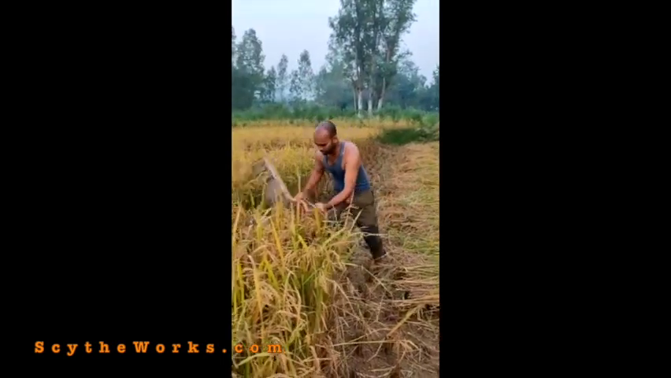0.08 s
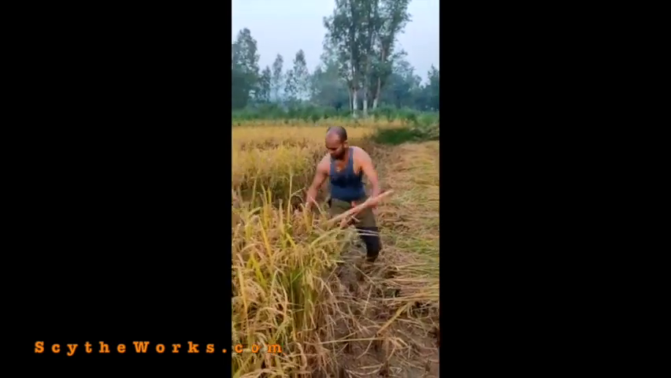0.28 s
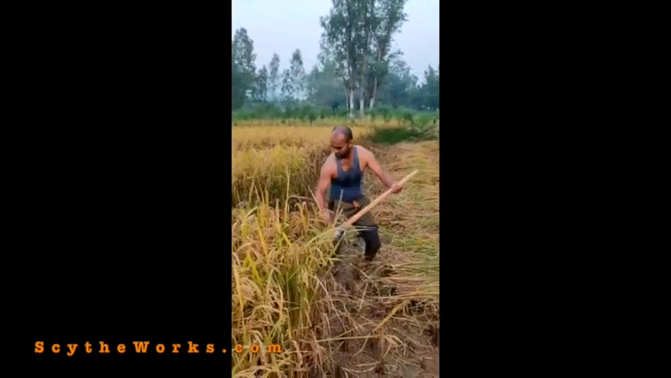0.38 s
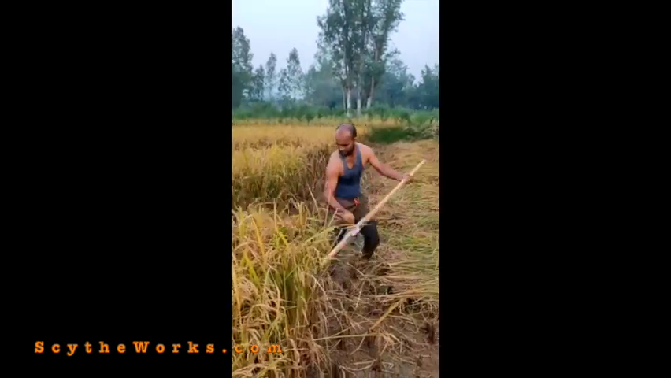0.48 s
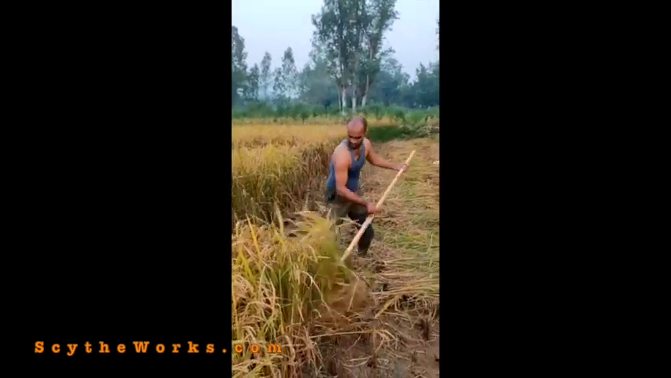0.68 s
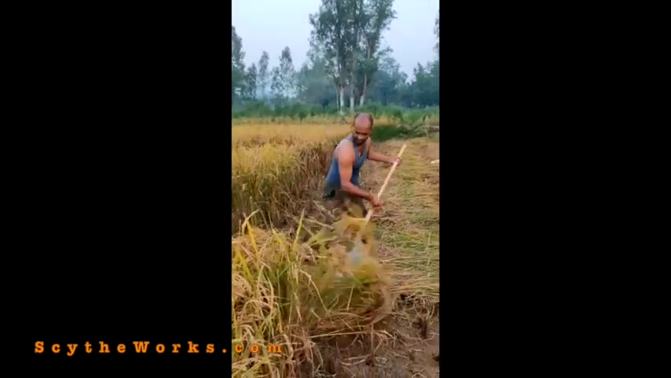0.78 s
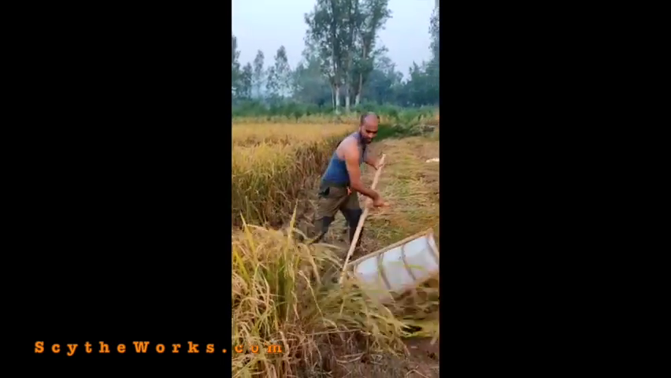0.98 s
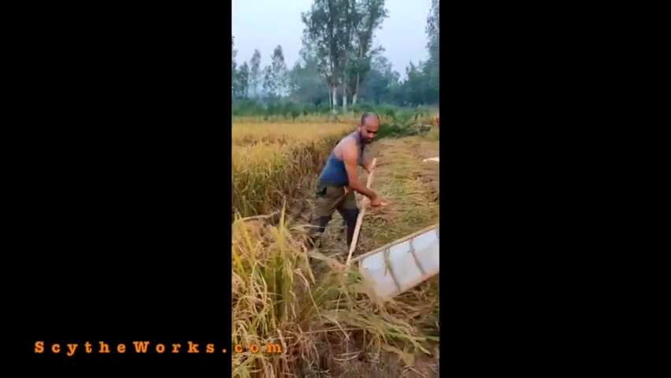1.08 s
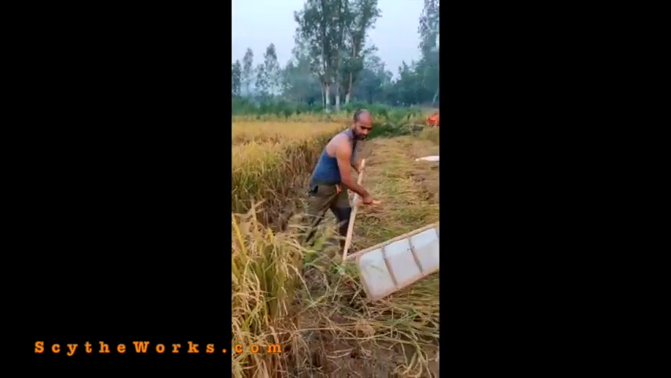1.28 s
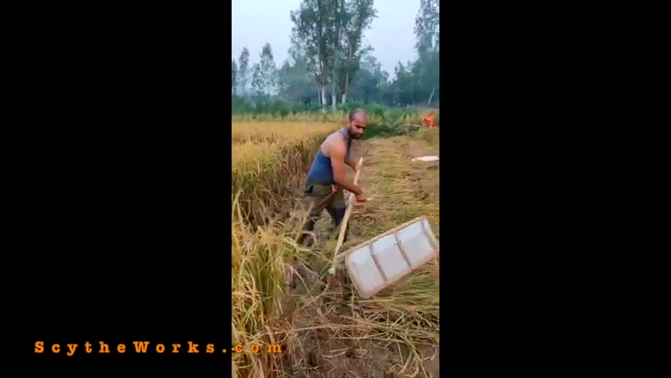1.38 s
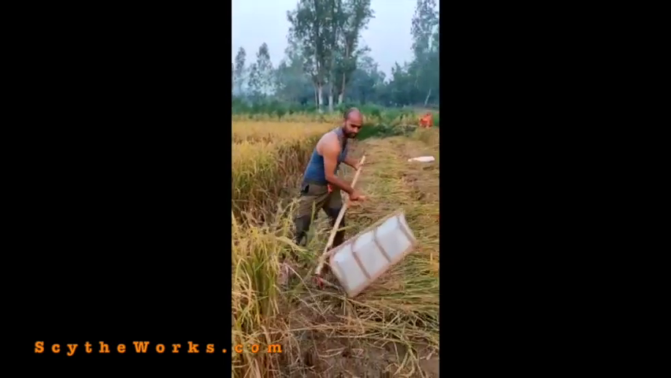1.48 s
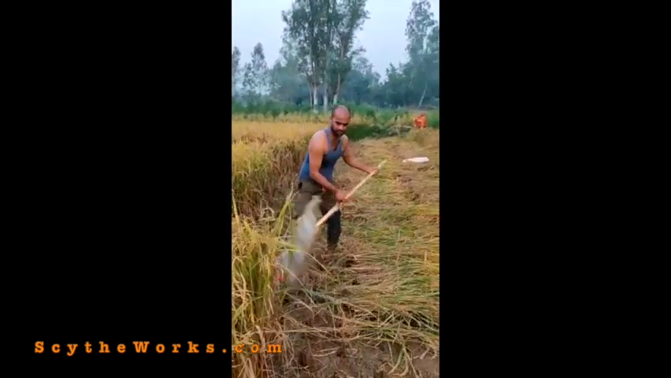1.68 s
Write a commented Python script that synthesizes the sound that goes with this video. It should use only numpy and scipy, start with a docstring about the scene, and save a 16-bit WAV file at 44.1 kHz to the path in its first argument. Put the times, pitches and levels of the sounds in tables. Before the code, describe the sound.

A scythe stroke cuts dry standing grain: a few small snaps, then a dense crunch with bright leafy rustle, dull knocks and cracking stalks, fading to faint snaps; quiet open field, close stereo microphone.

```python
"""One stroke of a cradle scythe through ripe rice in a quiet field, close by, on two small microphone ports.
Field hiss (smooth noise) and a light breeze (low lumpy noise) lie underneath; three stalks snap early (noise bursts).
Then the blade crunches (hard ticks), leaves and ears rustle (fine ticks), the swath thuds (low ticks) and knocks
(swelling sines) and stalks snap in quick succession. As the swath slides along the cradle a hollow noise band sinks;
a few faint snaps follow while the rustle dies away, and a little crunch rises at the very end."""
import sys
import numpy as np
from scipy import signal
from scipy.fft import rfft, irfft, next_fast_len
from scipy.io import wavfile

SR = 44100
rng = np.random.default_rng(int(sys.argv[2]) if len(sys.argv) > 2 else 0)


def log_audio(samples):
    """Write samples as a 16-bit WAV file to the path given in sys.argv[1]."""
    # one column per channel
    frames = np.atleast_2d(samples).T
    # limit to full scale, then quantise
    limited = np.clip(frames, -1, 1)
    pcm = np.round(limited * 32767).astype(np.int16)
    wavfile.write(sys.argv[1], SR, pcm)


N = 74970  # samples, 1.7 s


def amp(db):
    """Amplitude factor for a level in dB."""
    return 10 ** (np.asarray(db) / 20)


def rms_one(x):
    """Scale to rms 1 over all channels together."""
    return x / np.sqrt(np.mean(x ** 2) + 1e-20)


def in_time(rows, outside=None):
    """Each column drawn as straight lines over time; the end values hold unless outside is given."""
    s, *columns = np.transpose(rows)
    return [np.interp(np.arange(N) / SR, s, c, outside, outside) for c in columns]


def at_hz(points, hz):
    """Table value at a frequency, interpolated on a logarithmic frequency axis."""
    table_hz, values = np.array(points).T
    return np.interp(np.log(hz), np.log(table_hz), values)


def pan(db):
    """Left and right gains for a left-minus-right level."""
    return amp(np.array([db / 2, -db / 2]))


def shaped(x, gain):
    """Filter by a gain given as a function of frequency."""
    size = next_fast_len(N + 4096)
    hz = np.maximum(np.fft.rfftfreq(size, 1 / SR), 1)
    return irfft(rfft(x, size) * gain(hz), size)[..., :N]


def drift(rate_hz):
    """Slow random wander, rms 1: noise through two equal poles at rate_hz, made at SR / 40."""
    r = np.exp(-80 * np.pi * rate_hz / SR)
    noise = rng.standard_normal(N // 40 + 2002)
    slow = signal.lfilter([1], [1, -2 * r, r * r], noise)[2000:]  # drop the filter's start-up
    return np.interp(np.arange(N) / 40, np.arange(len(slow)), rms_one(slow))


def grains(per_s, spread_db, clump_db, clump_hz):
    """Two random tick trains of uneven size and sign, swelling in shared clumps; rms 1."""
    sizes = amp(spread_db * np.minimum(rng.exponential(1, (2, N)), 5))
    signed = sizes * rng.choice([-1, 1], (2, N))
    struck = rng.random((2, N)) < per_s / SR
    return rms_one(signed * struck * amp(clump_db * drift(clump_hz)))


# how alike left and right are: f/Hz, correlation (1 = the same)
LEFT_RIGHT_LIKENESS = [(60, 1), (250, 0.78), (500, 0.78), (1000, 0.42), (2000, 0.48), (3500, 0.4),
                       (8000, 0.098), (15000, 0.049)]


def coloured(source, spectrum, patchy_db):
    """Mid and side mixed by likeness, coloured, then half-octave bands flicker each on its own; rms 1."""
    def alike(hz):
        return np.clip(at_hz(LEFT_RIGHT_LIKENESS, hz), -1, 1)

    mid = shaped(source[0], lambda hz: amp(at_hz(spectrum, hz)) * np.sqrt(1 + alike(hz)))
    side = shaped(source[1], lambda hz: amp(at_hz(spectrum, hz)) * np.sqrt(1 - alike(hz)))
    both = np.array([mid + side, mid - side])
    out = 0
    lowest, highest = np.log2(spectrum[0][0]), np.log2(spectrum[-1][0])
    for centre in np.arange(lowest, highest + .5, .5):  # octaves
        band = shaped(both, lambda hz: np.clip(1 - 2 * abs(np.log2(hz) - centre), 0, 1))
        out = out + amp(patchy_db * drift(37.0)) * band
    return rms_one(out)


# colour of the hiss over the crop: f/Hz, relative level/dB per Hz
FIELD_COLOUR = [(88, -63), (150, 1), (722, -7), (781, -4), (1000, -8.5), (1370, -16), (1480, -9),
                (1600, -6), (2810, -23), (7410, -21.5), (15500, -61)]
HISS_DB = -55.5  # ahead of the ports
BREEZE_DB, BREEZE_TOP_HZ, BREEZE_LUMPY_DB = -56.5, 77, -2


def field():
    """Smooth far hiss of the crop, and a lumpy breeze rumbling on the ports, largely shared by both."""
    hiss = amp(HISS_DB) * coloured(rng.standard_normal((2, N)), FIELD_COLOUR, patchy_db=1.5)
    shared, own = rng.standard_normal((2, N + SR))
    rumble_band = signal.butter(2, [14, BREEZE_TOP_HZ], "band", fs=SR, output="sos")
    rumble = signal.sosfilt(rumble_band, [shared + 0.42 * own, shared - 0.31 * own])
    rumble = rms_one(rumble[:, SR:])  # drop the filter's start-up second
    return hiss + amp(BREEZE_DB + BREEZE_LUMPY_DB * drift(15.0)) * rumble


SLIDE_HALF_WIDTH_HZ = 80
# hollow band as the swath slides along the cradle: t/s, centre f/Hz, level/dB of each quadrature part
SLIDE_PATH = [(.78, 1880, -70), (.87, 1820, -55), (1.0, 1720, -56), (1.12, 1600, -56), (1.25, 1480, -55),
              (1.32, 1420, -70)]


def slide():
    """A narrow band of noise whose centre sinks: two slow random signals ride a cosine and a sine."""
    centre_hz, _ = in_time(SLIDE_PATH)
    _, db = in_time(SLIDE_PATH, -120)
    phase = 2 * np.pi * np.cumsum(centre_hz) / SR
    a, b = amp(db) * np.array([drift(SLIDE_HALF_WIDTH_HZ), drift(SLIDE_HALF_WIDTH_HZ)])
    return a * np.cos(phase) + b * np.sin(phase)


KNOCK_SWELL_S, KNOCK_ROUGH = .007, .3  # time from onset to fullest push; share of random unevenness
# dull knocks of stems on the handle and cradle frame: t/s, envelope peak level/dB before roughening, pitch f/Hz
FRAME_KNOCKS = [(.314, -30, 195), (.338, -27, 230), (.338, -29, 990), (.375, -32, 900), (.398, -31, 210),
                (.413, -29, 360), (.411, -25, 930), (.435, -35, 100), (.458, -30, 880), (.563, -36, 220),
                (.563, -37, 750), (.795, -44, 350)]


def knocks():
    """Each knock is a soft push that swells and dies unevenly at one dull pitch."""
    out, t = np.zeros(N + 6000), np.arange(6000) / SR
    for s, db, hz in FRAME_KNOCKS:
        start = int(s * SR)
        push = amp(db) * t / KNOCK_SWELL_S * np.exp(1 - t / KNOCK_SWELL_S)
        out[start:start + 6000] += push * np.sin(2 * np.pi * hz * t + rng.uniform(0, 2 * np.pi))
    return out[:N] * (1 + KNOCK_ROUGH * drift(96.0))


# weight of the swath thudding on handle and cradle: t/s, level/dB before trim
SWATH_THUD = [(0.19, -65), (0.224, -44.5), (0.342, -31.5), (0.384, -37), (0.406, -29), (0.5, -35.5),
              (0.584, -45.5), (0.592, -47), (0.782, -56.5), (0.8, -53), (0.9, -56.5)]
# colour of the cradle frame: f/Hz, relative level/dB per Hz
CRADLE_COLOUR = [(15, -47), (25, -27), (92, -7.5), (128, -11), (194, -3.5), (357, -6), (512, -15.5),
                 (600, -13), (780, -21), (1320, -120)]


def thud():
    """Soft low jostling of the bundle against the frame: clumped ticks in a low colour."""
    db, = in_time(SWATH_THUD, -90)
    return amp(db - 2) * coloured(grains(830, 1.24, 0.69, 36), CRADLE_COLOUR, patchy_db=0.5)


SURGE_DB, SURGE_HZ = .7, 50
# leaves and ears rubbing: t/s, level/dB before trim and surges, left minus right level/dB
LEAF_RUSTLE = [(0.0, -51, 1), (0.16, -50.5, -3.5), (0.236, -32, -3.5), (0.34, -24, -1), (0.392, -24.5, 1.5),
               (0.434, -22.5, -3), (0.492, -27.5, 13), (0.554, -24.5, 1), (0.628, -23, 0.5),
               (0.832, -31.5, 1), (0.922, -37.5, 2), (1.008, -38.5, 3), (1.126, -38.5, -0.5),
               (1.192, -36, 4), (1.33, -38.5, 2), (1.396, -44.5, 1), (1.514, -47.5, 1.5), (1.7, -48.5, 0)]
# colour of leaves and husks, for rustle and snaps: f/Hz, relative level/dB per Hz
LEAF_COLOUR = [(2650, -20), (4500, -15), (6170, -15), (7240, -1.5), (7790, 0.5), (9140, -2), (10500, -21),
               (12000, -25), (14800, -25), (15500, -35)]


def rustle():
    """Thousands of tiny leaf and husk ticks a second, in small surges."""
    db, side_db = in_time(LEAF_RUSTLE)
    ticks = coloured(grains(9000, 0.66, 0.27, 270), LEAF_COLOUR, patchy_db=0.5)
    return amp(db + 2.5 + SURGE_DB * drift(SURGE_HZ)) * pan(side_db) * ticks


SNAP_T60_S, SNAP_RISE_S, SECOND_CRACK_S = .014, .0007, .0036  # 60 dB decay, rise constant, crack spacing
SNAP_TOP_HZ = 12500  # low-pass corner
# single stalks snapping: t/s, burst level/dB before rise and colour, stem part against husk part level/dB
STALK_SNAPS = [(.1186, -27, -14), (.1396, -28, -8), (.1805, -12, -24), (.354, -3, -12), (.3844, -1, -12),
               (.3975, 3, -11), (.4135, 0, -10), (.4304, 4, -17), (.4454, -4, -14), (.4575, 4, -9),
               (.489, -1, -13), (.569, -6, -9), (.5815, -4, -20), (1.187, -14, -24), (1.2, -15, -22),
               (1.2435, -13, -30), (1.27, -14, -22), (1.3235, -15, -30), (1.3815, -18, -20)]


def snaps():
    """A stalk cracks twice, each crack a burst of splinter noise: a bright husk part and a lower stem part."""
    parts = np.zeros((2, 2, N + 2000))  # husk or stem, left or right, samples
    t = np.arange(1000) / SR
    for s, db, stem_db in STALK_SNAPS:
        shape = (1 - np.exp(-t / SNAP_RISE_S)) * amp(db - 60 * t / SNAP_T60_S)
        part_gains = amp([0, stem_db])[:, None, None]
        for i in (int(s * SR), int((s + SECOND_CRACK_S) * SR)):
            parts[:, :, i:i + 1000] += rng.choice([-1, 1], (2, 2, 1000)) * shape * part_gains
    both = 0
    for part, colour in zip(parts, (LEAF_COLOUR, STEM_COLOUR)):
        top_db = np.max(np.array(colour)[:, 1])  # strongest frequency passes at 0 dB
        both = both + shaped(part[:, :N], lambda hz: amp(at_hz(colour, hz) - top_db))
    return signal.sosfilt(signal.butter(2, SNAP_TOP_HZ, fs=SR, output="sos"), both)


# blade crunching through stems: t/s, level/dB before trim, left minus right level/dB
BLADE_CRUNCH = [(0.0, -63, 5), (0.108, -59, 5), (0.146, -47.5, 3), (0.156, -56.5, -1), (0.254, -32, 1.5),
                (0.3, -30.5, 1.5), (0.42, -24, -4), (0.43, -28, -3), (0.468, -29, 9), (0.534, -35.5, 4),
                (0.576, -31, 2.5), (0.644, -37.5, 0), (0.974, -50.5, 0), (1.22, -48.5, 2),
                (1.552, -60, 2.5), (1.676, -59, 1), (1.7, -39.5, -2.5)]
# colour of stems, for crunch and snaps: f/Hz, relative level/dB per Hz
STEM_COLOUR = [(260, -7.5), (450, -9), (579, -11), (740, -4.5), (879, -3), (1350, -4), (1700, 0.5),
               (1960, -4), (3140, -4.5), (3580, -11.5), (6200, -6), (8060, -18), (13600, -120)]


def crunch():
    """Sparser, harder ticks of stems parting on the edge."""
    db, side_db = in_time(BLADE_CRUNCH)
    ticks = coloured(grains(3500, 2.6, 1.2, 60), STEM_COLOUR, patchy_db=1.5)
    return amp(db + 1.5) * pan(side_db) * ticks


def scene():
    """The whole stroke, background first."""
    return field() + slide() + knocks() + thud() + rustle() + snaps() + crunch()


CUTOFF_HZ = 15700
# colour difference of the two ports: f/Hz, left minus right level/dB
PORT_BALANCE = [(60, 6), (80, 3.5), (110, 9), (140, 5), (190, 7), (260, 4), (340, 8.5), (460, 7), (610, 0),
                (820, -3), (1100, 8), (1470, 4.5), (1960, 2.5), (2620, 0), (3510, -1.5), (4690, 1),
                (6270, -10.5), (8390, -1), (11200, 11.5), (15000, -6.5)]
# phase difference of the two ports: f/Hz, lead of left over right/rad
PORT_PHASE = [(0, 0), (950, .5), (3190, .1), (3530, -2.3), (5600, -6.5), (9560, -17.6)]


def record(dry):
    """The two microphone ports differ in colour and phase; a steep low-pass cuts the top."""
    lead_hz, lead_rad = np.array(PORT_PHASE).T

    def port_gain(hz):
        turn = np.exp([[.5j], [-.5j]] * np.interp(hz, lead_hz, lead_rad))  # half the lead on each port
        return pan(at_hz(PORT_BALANCE, hz)) * turn

    wet = shaped(dry, port_gain)
    return signal.sosfilt(signal.ellip(14, .5, 90, CUTOFF_HZ, fs=SR, output="sos"), wet)


dry = scene()
out = record(dry)
log_audio(out)
```